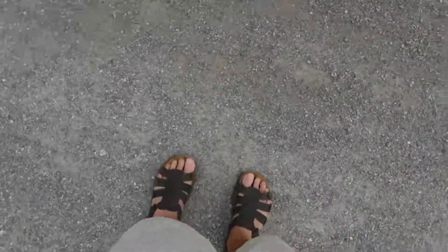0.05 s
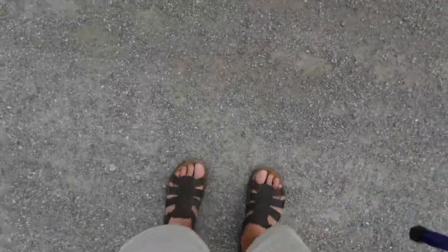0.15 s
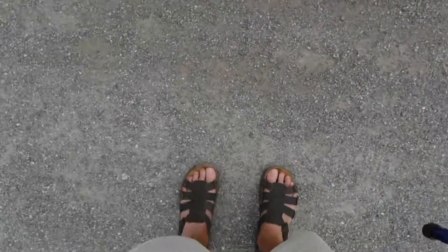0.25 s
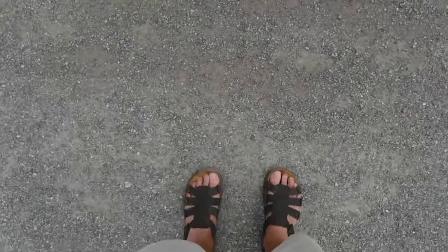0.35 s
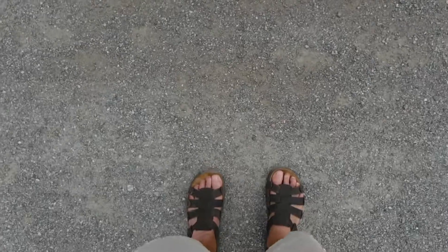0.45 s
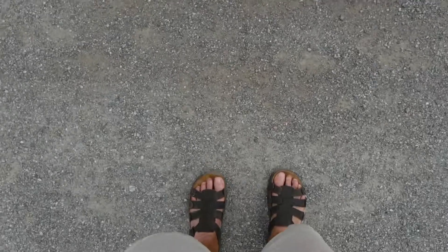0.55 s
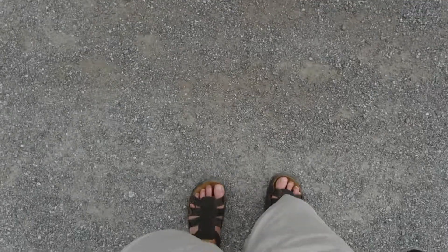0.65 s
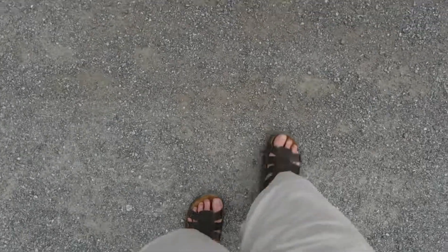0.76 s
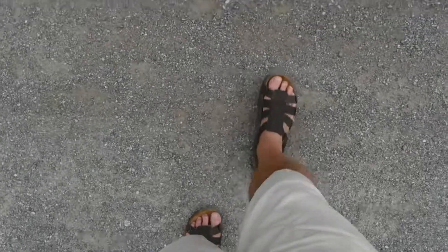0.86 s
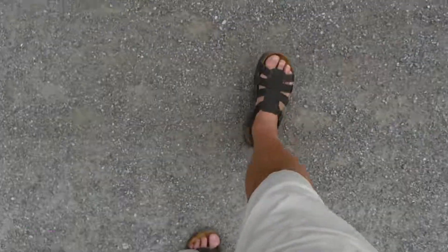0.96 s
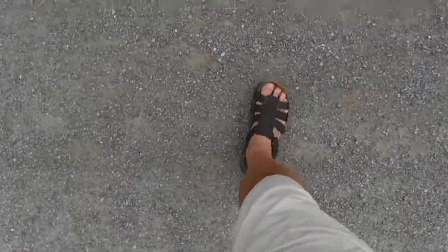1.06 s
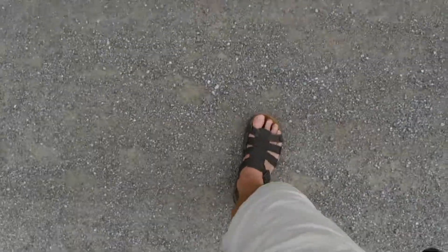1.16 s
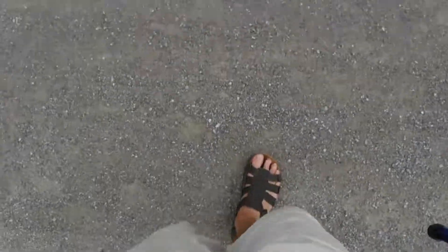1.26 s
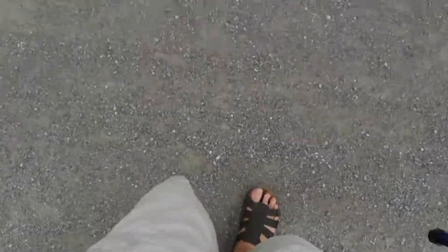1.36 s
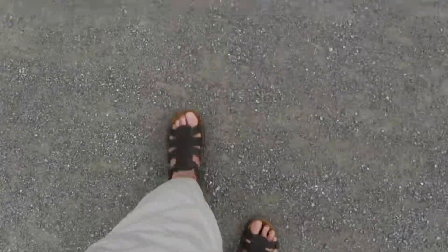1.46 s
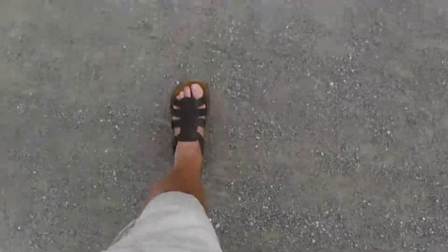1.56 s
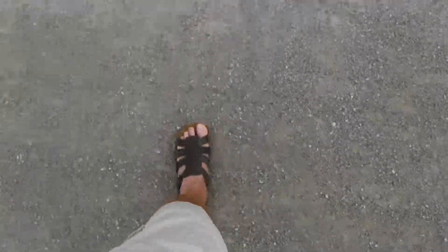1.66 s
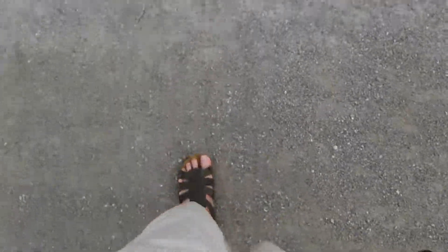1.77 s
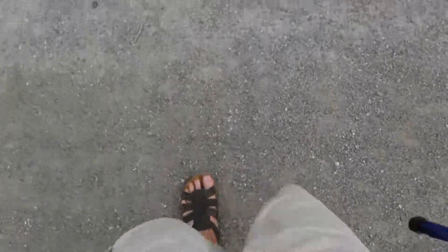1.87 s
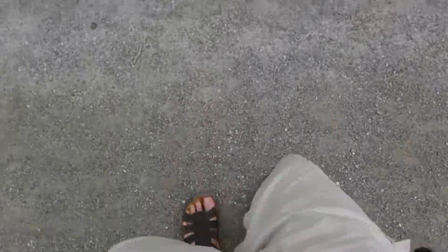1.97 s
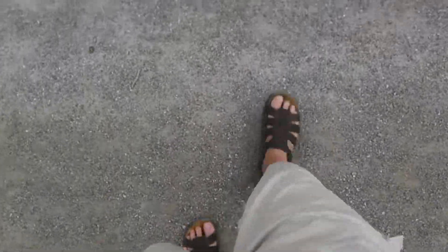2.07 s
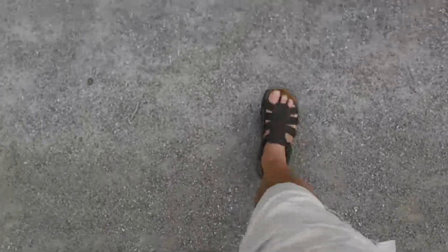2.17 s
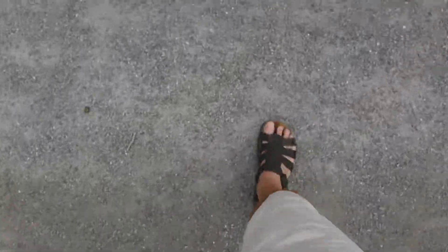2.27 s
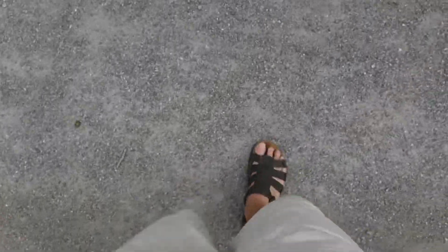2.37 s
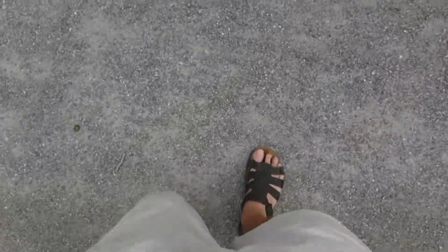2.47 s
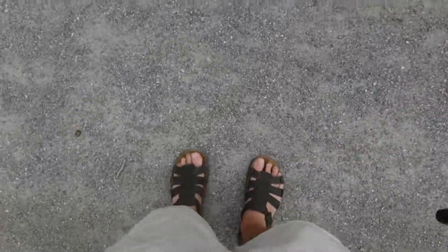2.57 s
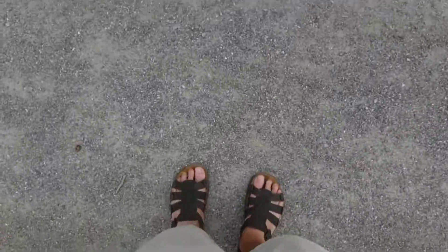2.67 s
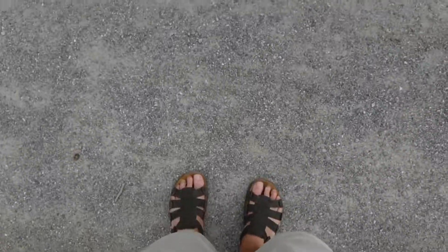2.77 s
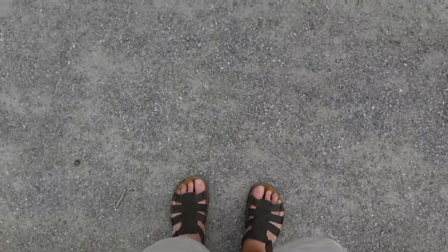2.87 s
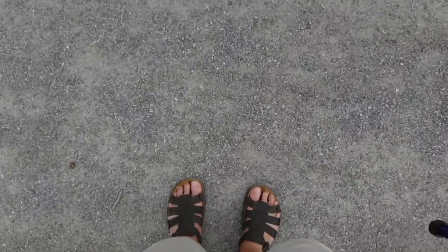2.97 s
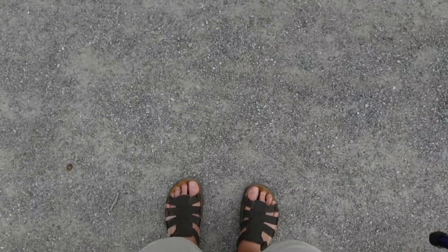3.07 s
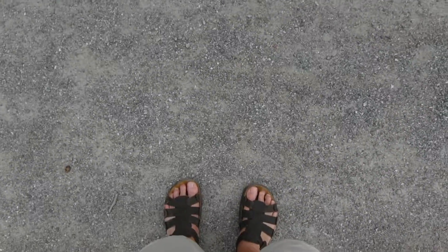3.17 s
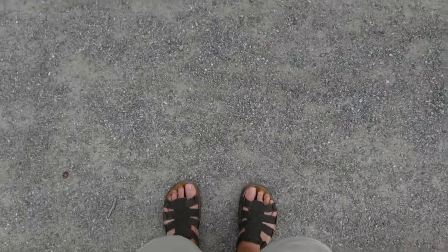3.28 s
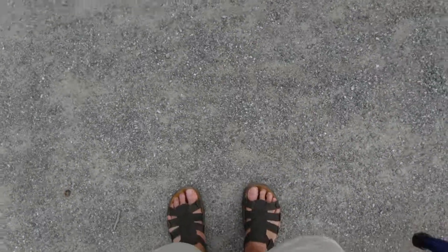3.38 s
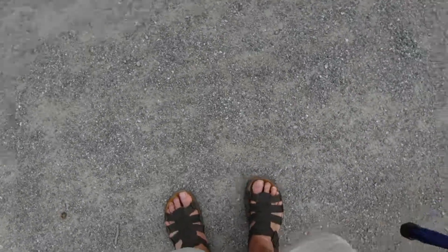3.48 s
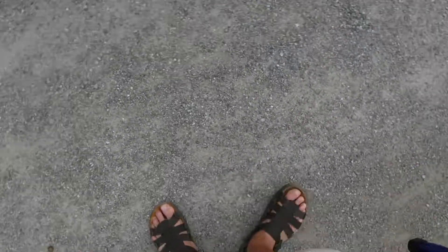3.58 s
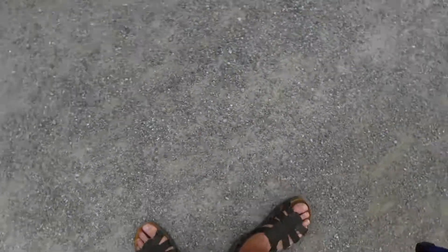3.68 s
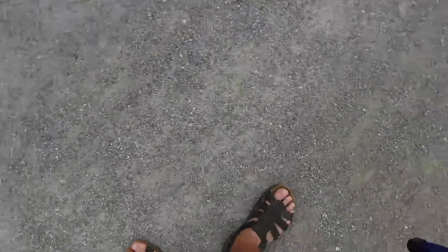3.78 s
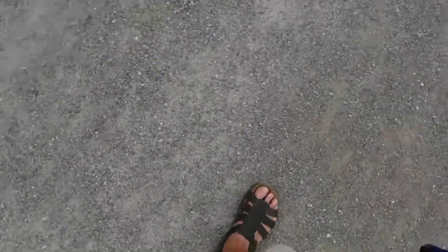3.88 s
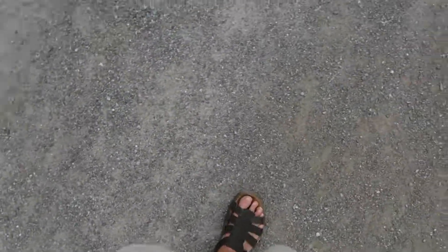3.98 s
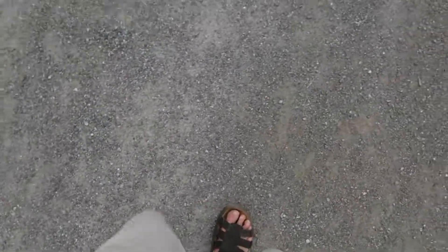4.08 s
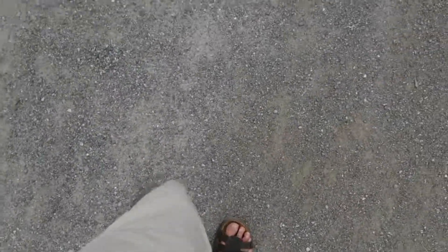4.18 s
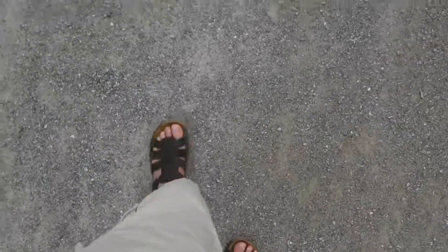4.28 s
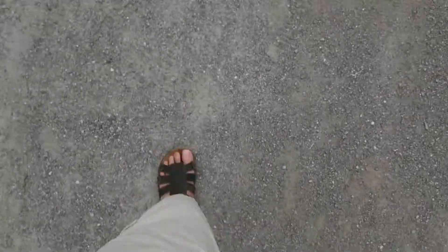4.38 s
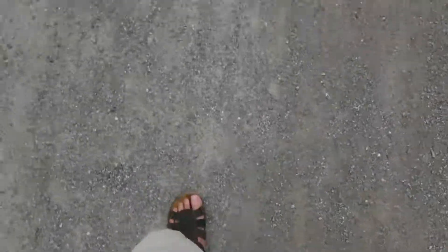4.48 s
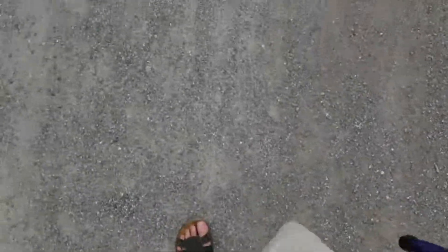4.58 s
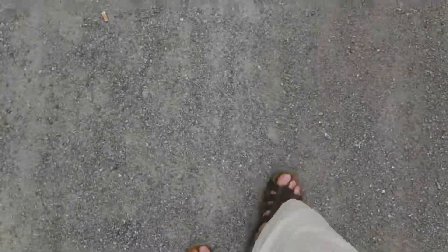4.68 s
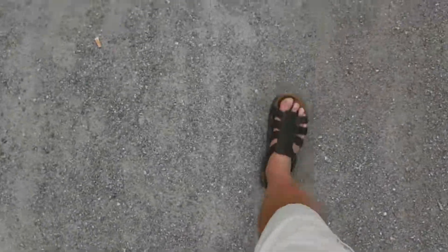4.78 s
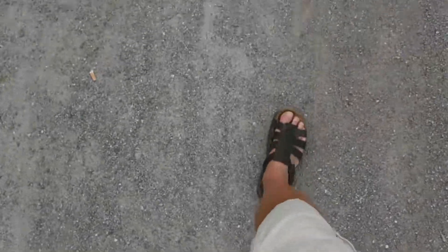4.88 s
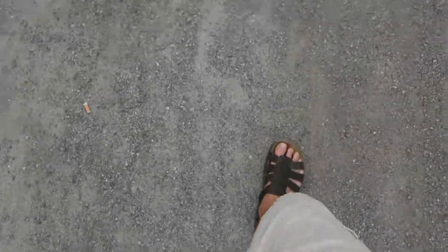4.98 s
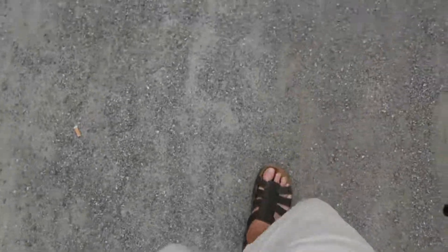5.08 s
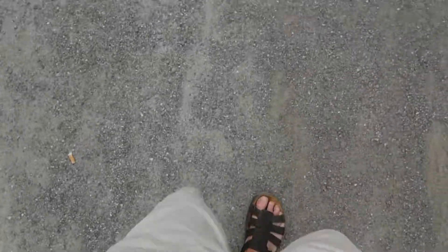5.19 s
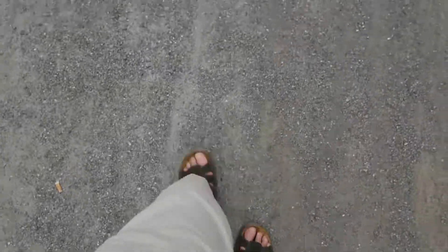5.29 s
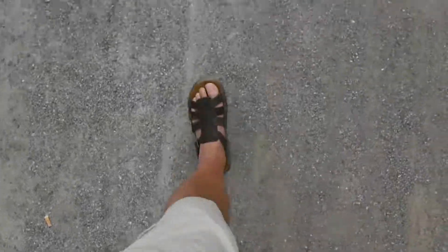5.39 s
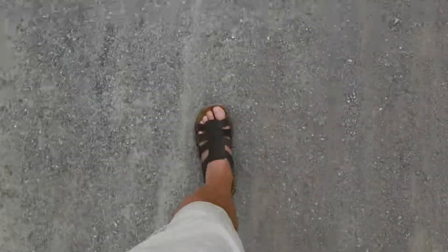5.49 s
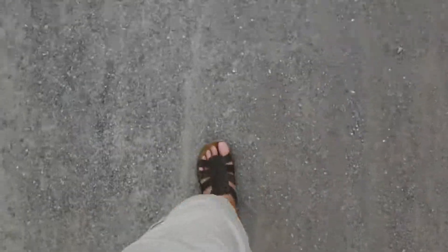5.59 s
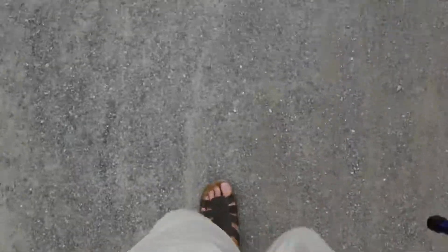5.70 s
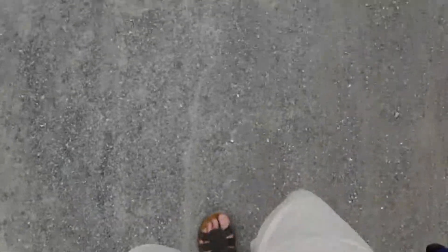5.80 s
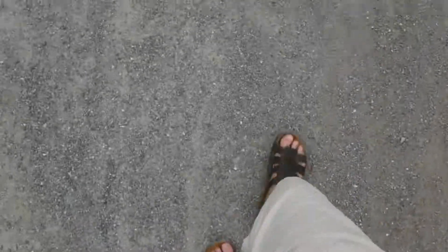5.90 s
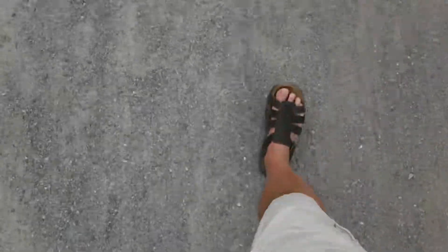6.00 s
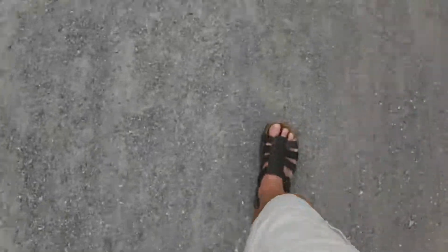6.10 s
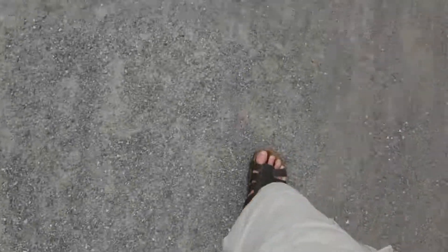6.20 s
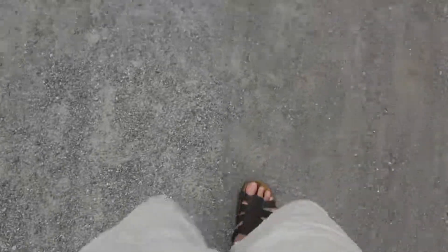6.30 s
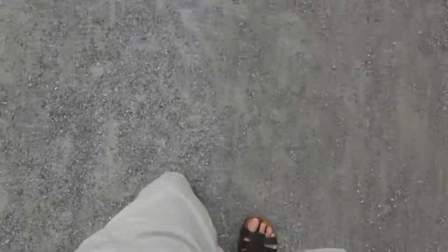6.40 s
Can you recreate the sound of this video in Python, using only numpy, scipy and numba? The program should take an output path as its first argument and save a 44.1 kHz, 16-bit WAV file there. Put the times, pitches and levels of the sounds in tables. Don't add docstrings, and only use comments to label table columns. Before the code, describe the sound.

Sandalled feet on gritty pavement, heard from a small camera at chest height. A quick crunch opens, then a near pause, several uneven steps with scuffs and snapping stones, a heavy grinding turn midway, then more steps. Quiet outdoor background: far rumble, distant tyres, smooth hiss and a few soft wind bumps.

```python
import sys
import numpy as np
from scipy import signal
from scipy.fft import rfft, irfft
from scipy.io import wavfile
from scipy.ndimage import uniform_filter1d
from numba import njit

SR = 44100
rng = np.random.default_rng(int(sys.argv[2]) if len(sys.argv) > 2 else 0)


def master(y):
    cut = np.clip(np.atleast_2d(y).T, -1, 1)
    pcm = np.round(cut * 32767)
    wavfile.write(sys.argv[1], SR, pcm.astype(np.int16))


def decibels_to_gain(level_db):
    exponent = np.asarray(level_db, float) / 20
    return 10 ** exponent


N = 284445


@njit
def svf(x, hz, width_hz):
    out = np.empty((3, len(x)))
    band_state, low_state = 0., 0.
    g, k = np.tan(np.pi * hz / SR), width_hz / hz
    for i in range(len(x)):
        band = (band_state + g * (x[i] - low_state)) / (1 + g * (g + k))
        low = low_state + g * band
        out[0, i], out[1, i], out[2, i] = low, k * band, x[i] - k * band - low
        band_state, low_state = 2 * band - band_state, 2 * low - low_state
    return out


@njit
def ring(start, hz, tau, size, glide, rise):
    y = np.zeros(N + 4096)
    for k in range(len(start)):
        w, a, soft = 2 * np.pi * hz[k] / SR, size[k], 1.
        fall, grip = np.exp(-1 / tau[k]), np.exp(-1 / (rise * tau[k]))
        phase = -np.angle(1 / (1 / tau[k] - 1j * w) - 1 / ((1 + 1 / rise) / tau[k] - 1j * w))
        for i in range(start[k], start[k] + int(6 * tau[k]) + 2):
            phase += w
            soft *= grip
            y[i] += a * (1 - soft) * np.sin(phase)
            a *= fall
            w *= 1 - glide / tau[k]
    return y[:N]


def unit(x):
    return x / np.sqrt(np.mean(x ** 2))


def walk(rate_hz):
    hold = int(SR / rate_hz)
    held = np.repeat(rng.standard_normal(N // hold + 1), hold)
    return unit(uniform_filter1d(uniform_filter1d(held, hold), hold)[:N])


def curve(table):
    s, value = np.transpose(table)
    return np.interp(np.arange(N) / SR, s, value)


def steps():
    # grains per s, centre in Hz, pitch spread in octaves, ring length in cycles,
    # size scatter in dB, trim in dB.
    coarse = (790, 1190, 0.39, 3.6, 1.4, 0.11)
    medium = (3000, 3780, 0.61, 1.5, 2.3, 0.17)
    fine = (2200, 8570, 0.29, 2.0, 4.5, 0.25)
    snapping = (90, 4300, 0.4, 1.2, 2.8, -10)
    # start in seconds, grit level in dB,
    # hold in seconds, fall in seconds per 20 dB, coarse grit relative level in dB.
    landings = [(0.005, -36, .03, .03, -12), (0.032, -28, 0.066, 0.02, -9.5), (1.03, -37, .025, 0.08, -16),
                (1.623, -35, 0.064, 0.11, -23), (2.228, -35, 0.0042, 0.01, -10), (2.578, -35, .01, .11, -6),
                (2.589, -27, .008, .04, -3), (3.452, -48, .02, .03, -8), (3.47, -30, .11, 0.19, -10),
                (3.836, -42, 0.0087, .1, -9), (4.0, -48, .035, .015, -10), (4.314, -26.5, .03, .035, -11),
                (4.47, -47, .04, .015, -20), (4.828, -46, .03, .03, -18), (4.851, -36, 0.038, 0.09, -14),
                (6.022, -37, .015, 0.08, -21), (6.113, -42, .01, .03, -18)]
    # time of most drag in seconds, grit level in dB,
    # rise and fall in seconds per 20 dB, sand relative level in dB.
    drags = [(.14, -49.5, 0.071, 0.16, -6), (.443, -55, .2, 0.32, -10), (0.661, -41, 0.12, .045, -16),
             (.97, -53, 0.17, .1, -7), (1.181, -41, .15, .08, -5), (1.55, -53, 0.2, .1, -14),
             (1.744, -39.5, .15, 0.082, -12.5), (1.8, -42, 0.076, .04, -15), (2.059, -49, 0.071, 0.07, -21),
             (2.26, -38, 0.18, 0.16, -13), (2.351, -43.5, .1, 0.04, -9), (3.319, -43, .055, .14, -6),
             (3.665, -25.5, .22, .065, -15), (3.78, -48, 0.059, .08, -5), (3.909, -44, .15, .2, -1),
             (3.987, -38.5, 0.066, .065, -2), (4.426, -32.5, 0.14, .09, -23), (4.7, -54.5, .25, 0.48, -7),
             (4.97, -34.5, 0.053, 0.11, -11.5), (5.238, -50, 0.1, .12, -20), (5.452, -39, .07, 0.12, -16),
             (5.55, -44, 0.18, .1, -11), (5.606, -34, .07, 0.074, -16), (6.14, -37.5, 0.07, .11, -20)]
    # time in seconds, level in dB.
    stir = [
        (0, -63),
        (1.0, -61),
        (2.3, -62),
        (2.5, -72),
        (3.1, -72),
        (3.4, -60),
        (5.85, -54),
        (6.45, -58),
    ]

    def mix(coarse_db, sand_db):
        return decibels_to_gain(2 * np.array([[0], [coarse_db], [sand_db]]))

    power = decibels_to_gain(2 * curve(stir)) * mix(coarse_db=-10.5, sand_db=-8.5)
    for s, db, hold_s, fall_s, coarse_db in landings:
        press = contact(s, db, .012, hold_s, fall_s)
        crush = contact(s, db, .012, hold_s, fall_s * .7)
        sand_db = -11 - 1.6 * max(db + 37, 0)
        power = power + np.array([press, crush, press]) * mix(coarse_db, sand_db)
    for s, db, rise_s, fall_s, sand_db in drags:
        power = power + contact(s, db, rise_s, 0, fall_s) * mix(-16, sand_db)

    busy = np.clip((power[0] / decibels_to_gain(2 * -40.5)) ** 0.325, .12, 1)
    out = path(cracks())
    for grains, floor_share, part in zip((medium, coarse, fine), (.3, .3, .8), power):
        rain = unit(path(grit(busy, *grains[:-1], floor_share)))
        out = out + rain * np.sqrt(part) * decibels_to_gain(grains[-1])

    snaps = unit(path(grit(np.ones(N), *snapping[:-1], .3))) * decibels_to_gain(snapping[-1] - 40)
    follow = .7
    return out + snaps * (np.sqrt(power[0]) / decibels_to_gain(-40)) ** follow


def contact(s, db, rise_s, hold_s, fall_s):
    t = np.arange(N) / SR - s
    lift_bend = 1.15
    attack = np.maximum(-t, 0) / rise_s
    release = (np.maximum(t - hold_s, 0) / fall_s) ** lift_bend
    return decibels_to_gain(2 * db - 44.1 * (attack + release))


def grit(busy, rate, hz, octaves, cycles, scatter_db, floor_share):
    when, pitch, size, sign, luck = rng.random((30000, 5))[:int(rate * N / SR)].T
    start = (when * N).astype(np.int64)
    spread = octaves * np.log(pitch / (1 - pitch)) / 1.68 + 0.15 * walk(25)[start]
    tone_hz = np.clip(hz * 2 ** spread, 300, .4 * SR)
    big = np.minimum(-np.log(1 - size), 3.6)
    force = np.sign(sign - .5) * decibels_to_gain(scatter_db * big) * (tone_hz / hz) ** 0.48
    force = force * (luck < busy[start]) / np.sqrt(busy[start])
    tau = cycles * SR / tone_hz / 2
    rain = ring(start, tone_hz, tau, force, 0., 0.1) * decibels_to_gain(1.8 * walk(70))
    edge_hz = floor_share * hz
    rain = svf(rain, edge_hz, 1.35 * edge_hz)[2]
    return svf(rain, edge_hz, 1.35 * edge_hz)[2]


def cracks():
    # time in seconds, peak in dB, ring in Hz, ring length in ms.
    stones = [(0.0662, -7.5, 3950, 0.66), (0.0747, -11, 3160, .37), (0.0826, -7.5, 2860, .46),
              (1.034, -15.5, 2800, 0.87), (1.1375, -3, 4370, 0.23), (1.618, -18, 4000, .99),
              (1.646, -12.5, 5400, 0.47), (1.6513, -3, 3500, .5), (2.574, -12, 2930, 0.73),
              (2.5805, -15, 2480, 1.0), (2.5902, -6.5, 2650, 0.59), (2.5974, -5, 1480, 4.6),
              (3.3327, -10.5, 4100, 0.2), (3.4643, -12, 3730, .64), (3.4705, -9, 2070, 0.83),
              (3.4785, -12.5, 3480, 2.2), (3.4939, -8.5, 1500, 3.1), (3.4983, -9, 3120, 1.3),
              (3.504, -3.5, 2600, 1.0), (3.51, -10, 3300, 1.4), (3.5417, -8.5, 2880, .97),
              (3.6627, -5.5, 4930, 0.56), (3.7748, -5, 3430, 0.64), (3.8219, -15.5, 1970, 0.68),
              (4.342, -15, 2300, .69), (4.4488, -17.5, 2900, 1.9), (4.9484, -12.5, 3900, .87),
              (5.2273, -10, 4300, 0.45), (6.1176, -17, 2740, 0.4), (6.1389, -16.5, 4100, 1.2)]
    # time in seconds, peak in dB, ring in Hz.
    pebbles = [(0.0175, -17, 3530), (0.024, -20, 4100), (1.0446, -18.5, 2760), (1.06, -13, 6440),
               (1.1004, -18.5, 3840), (1.1549, -20, 3860), (1.2205, -23, 3470), (1.665, -17, 3660),
               (1.7077, -22, 4360), (1.7452, -11.5, 5200), (1.7777, -24, 3740), (2.04, -21.5, 3570),
               (2.1588, -20.5, 3940), (2.195, -17, 3900), (2.2857, -19.5, 5030), (2.6185, -18.5, 3670),
               (2.6327, -17.5, 4200), (2.687, -27.5, 2540), (3.514, -10, 3000), (3.6509, -14, 4700),
               (3.708, -13, 2830), (3.9844, -20.5, 3300), (4.2719, -18.5, 3850), (4.3644, -14, 3000),
               (4.461, -15, 3830), (4.9077, -14.5, 4050), (4.9592, -14.5, 4800), (5.2023, -15, 3500),
               (5.4955, -17, 4070), (5.605, -20, 3340)]
    # time in seconds, peak in dB.
    strays = [(0.1652, -24), (0.2074, -24), (0.298, -30), (0.356, -34), (0.5963, -26), (0.996, -24.5),
              (1.433, -28), (1.449, -29), (1.5258, -25), (1.5394, -24), (1.567, -25), (1.885, -27.5),
              (2.1114, -29), (2.8407, -29), (3.2885, -25), (4.0735, -26.5), (4.1304, -21.5), (4.1722, -22),
              (4.2374, -28.5), (4.6199, -26), (4.677, -25.5), (5.169, -34), (5.3855, -22.5), (5.7141, -29),
              (5.7352, -23.5), (5.8148, -26), (5.8308, -25), (5.8874, -26), (5.9194, -28), (6.3857, -27)]
    pebble_cycles, stray_hz, stray_ms = 2, 4300, 0.36

    rows = list(stones)
    rows += [(s, db, hz, 1000 * pebble_cycles / hz) for s, db, hz in pebbles]
    rows += [(s, db, stray_hz, stray_ms) for s, db in strays]
    s, peak_db, hz, ms = np.transpose(rows)
    start = (s * SR).astype(np.int64)
    tau = np.maximum(0.31 * ms * SR / 1000, 2)
    out = ring(start, hz, tau, decibels_to_gain(peak_db + 3.0), 0.093, 0.26)
    for late, pitch, sign in rng.random((len(s), 4, 3)).transpose(1, 2, 0):
        lag = (SR * (0.0003 + .002 * late ** 2)).astype(np.int64)
        chip = np.sign(sign - .5) * decibels_to_gain(peak_db - 8.0 - 5.9 * late)
        out = out + ring(start + lag, hz * (.55 + .7 * pitch), tau * 0.5, chip, 0., 0.29)
    return out


def path(x):
    port_hz, port_width_hz, port_db = 5775., 950., 0
    x = svf(x, 250.0, 580.0)[2]
    x = x + decibels_to_gain(port_db) * svf(x, port_hz, port_width_hz)[1]
    body = svf(svf(x, 6530.0, 8030.0)[0], 9170.0, 11750.0)[0]
    return body + decibels_to_gain(-24.5) * x


def wind():
    # centre in seconds, level in dB, half width in seconds.
    gusts = [
        (1.27, -61, 0.088),
        (3.33, -48.5, 0.14),
        (5.04, -44.5, 0.075),
        (6.1, -58.5, 0.049),
    ]
    # time in seconds, peak in dB, Hz.
    knocks = [
        (2.593, -38, 280),
        (3.219, -35, 75),
        (3.29, -31.5, 67),
        (3.365, -34, 83.4),
        (3.448, -40, 86.5),
        (4.325, -34.5, 240),
        (4.959, -35, 44),
        (5.061, -41, 45),
        (5.102, -33.5, 264),
        (5.151, -38.5, 260),
    ]
    breeze_db, boom_hz = -56, 61.5

    eddies = svf(svf(rng.standard_normal(N), 71.0, 96.0)[0], 21.0, 21.6)[2]
    boom = svf(eddies, boom_hz, 5.3)[1]
    eddies = (eddies + 0.4 * boom) * decibels_to_gain(0.67 * walk(8.5))
    t = np.arange(N) / SR
    gust = decibels_to_gain(breeze_db) + sum(decibels_to_gain(db) * np.exp(-((t - s) / half_s) ** 2) for s, db, half_s in gusts)
    s, peak_db, hz = np.transpose(knocks)
    bumps = ring((s * SR).astype(np.int64), hz, .35 * SR / hz, decibels_to_gain(peak_db + 6), 0., 0.41)
    return unit(eddies) * gust + bumps


def air():
    # frequency in Hz, level in dB per Hz.
    spectrum = [(59, -28), (100, -1.5), (244, -5.5), (302, -4.5), (608, -12.5), (705, -14.5), (818, -17),
                (1420, -13.5), (2630, -20), (4670, -19), (15000, -29.5), (16000, -32)]
    # time in seconds, level in dB.
    murmur = [
        (0, -67.5),
        (1.1, -63.5),
        (1.3, -58.5),
        (2.1, -59.5),
        (2.5, -63),
        (3.1, -64),
        (4.0, -66),
        (6.45, -62),
    ]

    hz, db = np.transpose(spectrum)
    log_hz = np.log(np.arange(1, N // 2 + 2) * SR / N)
    hiss = irfft(rfft(rng.standard_normal(N)) * decibels_to_gain(np.interp(log_hz, np.log(hz), db)), N)
    rumble = svf(hiss, 830.0, 930.0)[0]
    hiss = hiss + rumble * (decibels_to_gain(1.0 * walk(3.05)) - 1)
    tyres = svf(svf(rng.standard_normal(N), 653.0, 510.0)[1], 653.0, 510.0)[1]
    return unit(hiss) * decibels_to_gain(-56) + unit(tyres) * decibels_to_gain(curve(murmur))


def scene():
    return (steps() + wind() + air())[None]


def top_cut(x):
    return signal.sosfilt(signal.butter(12, 15848, fs=SR, output="sos"), x)


def record(dry):
    return top_cut(dry)


dry = scene()
out = record(dry)
master(out)
```